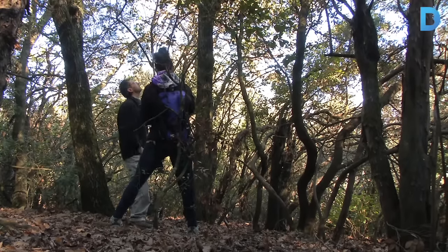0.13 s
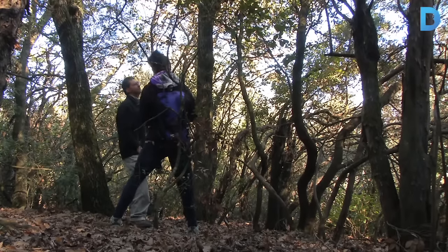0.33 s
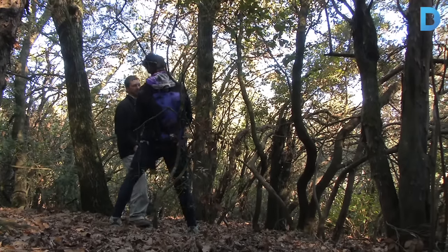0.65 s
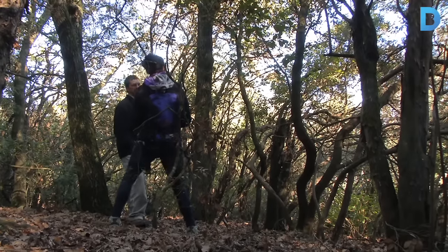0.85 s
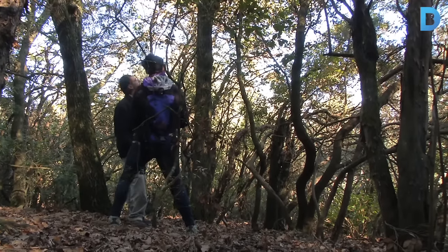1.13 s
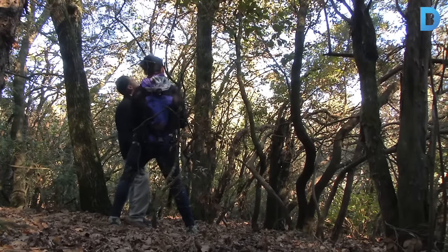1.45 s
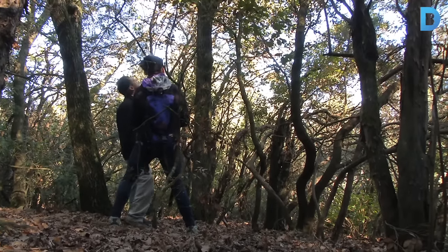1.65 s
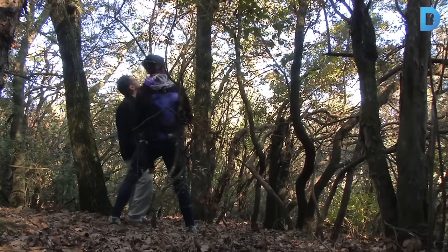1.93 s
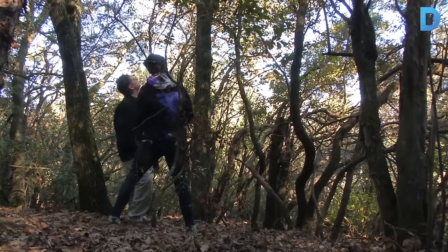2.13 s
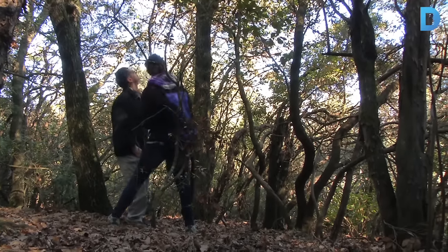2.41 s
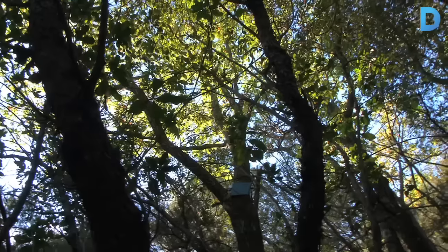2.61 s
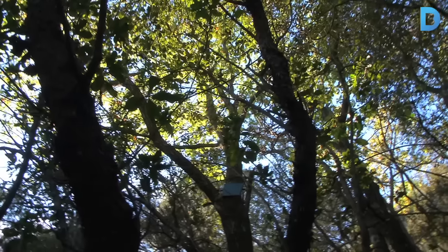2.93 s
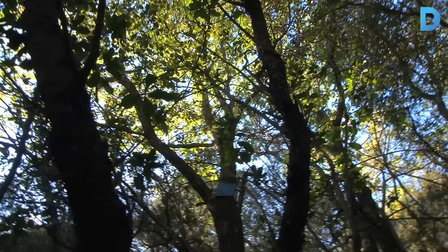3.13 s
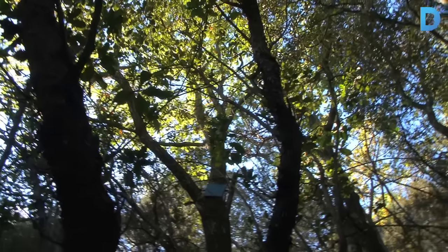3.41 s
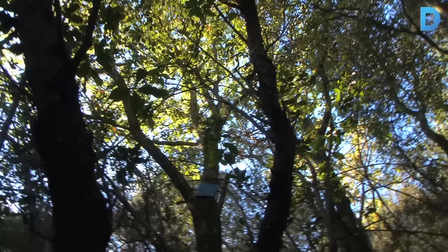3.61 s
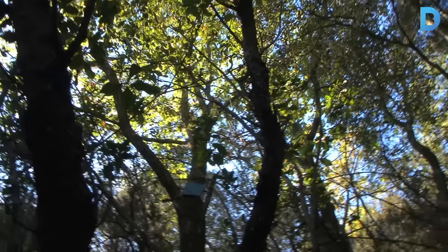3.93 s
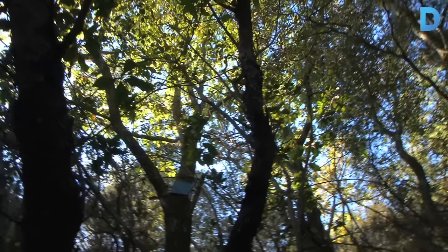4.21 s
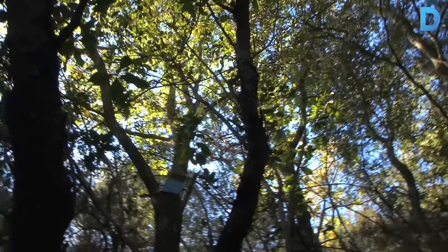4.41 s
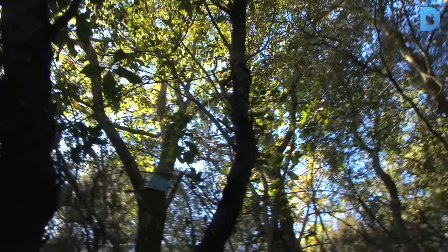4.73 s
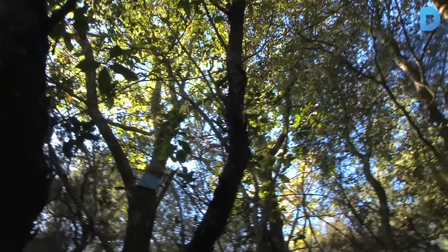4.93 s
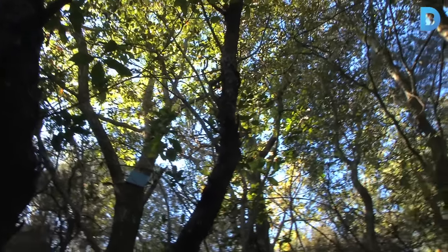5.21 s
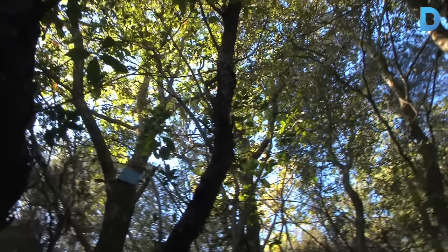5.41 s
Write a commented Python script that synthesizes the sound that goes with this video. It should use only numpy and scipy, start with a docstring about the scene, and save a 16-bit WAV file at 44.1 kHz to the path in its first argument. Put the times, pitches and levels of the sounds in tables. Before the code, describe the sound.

A quiet forest bed of low rumble and fine hiss runs throughout, dipping a little after the opening and partly recovering. From about 0.15 to 0.75 s a woodpecker drums some fifteen blows, quickly building, accelerating, then weakening; each has a hollow woody ring and a broad crack, and the echoes hang in the trees. Faint thin whistles come around 1.3-1.5 s. From 1.5 to 2.65 s a small bird sings six see-saw pairs, a clear rising high note and a huskier falling one, distant and diffuse. At 2.8 s a larger, nearer bird gives a thin rising squeal that cracks lower and ends hoarsely by 3.05 s. A buzzy, fluttering trill of nine syllables runs from 3.25 to 4.2 s. From 3.75 s ten short, bright, nasal yelps start, soon settling to about five per second and lasting to the end, around 5.5 s, with scattered high whistles between.

```python
"""A low rumble and a fine hiss open the scene and last throughout: two noises with shaped spectra.
A woodpecker drums: each blow rings a hollow branch and adds a broad crack. Small birds give thin whistles,
a see-saw song and a buzzy trill, all made from bent, fluttering sines. A larger bird squeals, then yelps
a run of loud notes, both built from harmonics. Trunks and leaves scatter every sound but the background."""
import sys
import numpy as np
from scipy import signal
from scipy.fft import rfft, irfft
from scipy.io import wavfile

SR = 44100
rng = np.random.default_rng(int(sys.argv[2]) if len(sys.argv) > 2 else 0)


def master(y):
    """Save y as 16-bit WAV."""
    cut = np.clip(np.atleast_2d(y).T, -1, 1)
    pcm = np.round(cut * 32767)  # scale
    wavfile.write(sys.argv[1], SR, pcm.astype(np.int16))


N = 245175


def from_db(db):
    """Turn decibels into a gain."""
    return 10 ** (np.asarray(db) / 20)


def rms_one(x):
    """Scale a sound to an rms (average strength) of 1."""
    return x / np.sqrt(np.mean(x ** 2) + 1e-20)


def along(rows, at):
    """Read every later column of a table at the given places of its first column."""
    first, *columns = np.transpose(rows)
    return [np.interp(at, first, column) for column in columns]


def at_hz(points, hz):
    """Read a spectrum in dB, with straight lines between its points on a log-frequency axis."""
    knots, values = np.transpose(points)
    return np.interp(np.log(hz + 1), np.log(knots), values)


def add(out, start_s, sound):
    """Mix a sound in at a given time."""
    start = max(round(start_s * SR), 0)
    out[start:start + len(sound)] += sound[:N - start]


def waver(rate_hz, size):
    """Random wandering about 0: straight lines between random values of spread 1."""
    step = SR / rate_hz
    knots = rng.standard_normal(1024)
    return np.interp(np.arange(size) / step, np.arange(len(knots)), knots)


def coloured_noise(spectrum):
    """Steady noise with a given spectrum, rms 1."""
    hz = np.arange(N // 2 + 1) * SR / N
    white = rfft(rng.standard_normal(N))
    return rms_one(irfft(white * from_db(at_hz(spectrum, hz)), N))


def ring(clicks, hz, t60):
    """A resonance passed twice: a unit click swells to a sine of height about 1, then dies away."""
    decay = np.log(1000) / (t60 * SR)
    w = 2 * np.pi * hz / SR
    r = np.exp(-decay)
    section = [0, np.sin(w), 0, 1, -2 * r * np.cos(w), r * r]
    return 2 * np.e * decay * signal.sosfilt([section, section], clicks + 1e-18)


def whistle(length_s, sweep_hz, warble, warble_hz, rough):
    """One near-sine note bent through three pitches; the bird's voice organ flutters around that line."""
    u = np.linspace(0, 1, int(length_s * SR))   # place within the note
    line_hz = np.polyval(np.polyfit([0, .5, 1], sweep_hz, 2), u)
    flutter = warble * np.sin(2 * np.pi * warble_hz * length_s * u) + rough * waver(511, len(u))
    phase = 2 * np.pi * np.cumsum(line_hz * (1 + flutter)) / SR
    swell = signal.windows.tukey(len(u), .3)
    return np.sqrt(2) * swell * np.sin(phase)


def forest(x, direct_db, near_db, near_t60, far_db, far_t60, build_s, dull_hz):
    """Direct sound, a quick scatter from near trunks, and a long tail that builds up from the wood beyond."""
    t = np.arange(SR * 3 // 2) / SR
    echoes = rng.standard_normal((2, len(t)))
    near = rms_one(echoes[0] * from_db(-60 * t / near_t60) * (t > .002))
    far = rms_one(echoes[1] * from_db(-60 * t / far_t60) * np.minimum(t / build_s, 1))
    scatter = (from_db(near_db) * near + from_db(far_db) * far) / np.sqrt(len(t))
    # both scatters lose treble
    dulling = signal.butter(1, min(dull_hz, SR / 2 - 100), fs=SR, output="sos")
    scatter = signal.sosfilt(dulling, scatter)
    return from_db(direct_db) * x + signal.fftconvolve(x, scatter)[:N]


# How the background level moves. Each row: time in seconds, level in dB before the shared gain.
BACKGROUND_LEVEL = [(0.02, -36), (0.74, -35.5), (1.29, -40.5), (1.89, -38), (5.56, -37.5)]
# Tone colour of the low rumble. Each row: frequency in Hz, relative strength in dB.
RUMBLE_SPECTRUM = [(20, -10.5), (55, -3), (80, -3), (115, -1), (160, -0.5), (230, -4), (320, -7),
                   (460, -10.5), (950, -17), (2500, -24), (5000, -53)]
# Tone colour of the fine hiss. Each row: frequency in Hz, relative strength in dB.
HISS_SPECTRUM = [(1500, -12.5), (3000, -1.5), (5000, -2), (7000, -2), (9000, -1), (11000, 1), (13300, 5),
                 (15000, 2.5), (16000, -1)]


def background(gain_db):
    """Low rumble and fine hiss as shaped noise; both sink after the drum roll, then partly recover."""
    level_db, = along(BACKGROUND_LEVEL, np.arange(N) / SR)
    rumble = coloured_noise(RUMBLE_SPECTRUM)
    hiss = coloured_noise(HISS_SPECTRUM)
    return from_db(level_db + gain_db) * (rumble + hiss)


# the gap between blows closes on a shortest gap, keeping a share of the excess each time
ROLL_START_S, FIRST_GAP_S, SHORTEST_GAP_S, GAP_KEEPS = .1528, .05727, .02914, .915
# strongest blow in dB, then the slopes in dB per blow: building up, tiring and giving out
ROLL_DB, ROLL_BUILD_DB, ROLL_TIRE_DB, ROLL_QUIT_DB = -11, 3, 0.32, 2.5


def drum_roll(count, peak_index, quit_index):
    """Times and levels of the beak's blows: they come ever faster, build, tire and give out."""
    k = np.arange(count)
    gaps = SHORTEST_GAP_S + (FIRST_GAP_S - SHORTEST_GAP_S) * GAP_KEEPS ** k
    times = ROLL_START_S + np.cumsum(gaps) - gaps
    build_loss_db = ROLL_BUILD_DB * np.maximum(peak_index - k, 0)
    tire_loss_db = ROLL_TIRE_DB * np.maximum(k - peak_index, 0)
    quit_loss_db = ROLL_QUIT_DB * np.maximum(k - quit_index, 0)
    return times, ROLL_DB - (build_loss_db + tire_loss_db + quit_loss_db)


# Ringing tones (modes) of the hollow branch.
# Each row: frequency in Hz, level in dB, time in seconds for one pass of the resonance to fall by 60 dB.
BRANCH_MODES = [(439, -16, 0.038), (690, -13.5, 0.027), (858, -20, 0.023), (1120, -26.5, 0.028),
                (1235, -14, 0.018), (1327, -24, 0.041), (1810, -29, 0.022), (2120, -17.5, .008),
                (2864, -8.5, 0.009), (3650, -5, 0.003), (3755, -6, 0.0056), (3977, -22.5, 0.031),
                (5140, -15, 0.0031), (6570, -14.5, 0.0024)]


def woodpecker(times, blow_db):
    """Each blow of the beak sets all modes of the hollow branch ringing."""
    out = np.zeros(N)
    for k, (hz, mode_db, t60) in enumerate(BRANCH_MODES):
        clicks = np.zeros(N)
        clicks[np.round(times * SR).astype(int)] = from_db(blow_db + mode_db)
        out += (-1) ** k * ring(clicks, hz, t60)   # neighbouring modes push opposite ways
    return out


def bark_cracks(times, blow_db, crack_db):
    """Each blow of beak on bark also throws a short broad crack: a click through a wide band filter."""
    clicks = np.zeros(N)
    clicks[np.round(times * SR).astype(int)] = from_db(blow_db + crack_db)
    crack_band = signal.butter(2, (790, 2630), "band", fs=SR, output="sos")   # Hz
    return signal.sosfilt(crack_band, clicks + 1e-18)


# Thin whistles of the small birds. Each row: start in seconds, length in seconds, start pitch in Hz,
# end pitch in Hz, level in dB before the forest, random pitch spread as a share of the pitch.
WHISTLE_NOTES = [(1.322, .059, 4500, 4670, -43.5, 0.07), (1.4, 0.06, 7180, 6850, -39.5, .025),
                 (1.433, .07, 6220, 5750, -38, .03), (2.809, 0.061, 4184, 4880, -30.5, 0.05),
                 (2.911, 0.12, 8730, 7760, -30.5, 0.01), (3.12, 0.053, 3460, 3680, -38.5, 0.04),
                 (3.227, 0.065, 5980, 6050, -28, 0.02), (3.348, 0.058, 6030, 6020, -30, 0.06),
                 (4.173, 0.11, 7760, 8050, -32, .02), (4.42, 0.023, 5470, 5480, -22.5, 0.01),
                 (4.49, 0.095, 7700, 7540, -32, 0), (4.611, 0.065, 4290, 4262, -30, .01),
                 (4.776, 0.072, 6700, 5930, -40.5, .11), (4.914, 0.1, 6840, 6540, -37.5, 0.01),
                 (5.01, 0.035, 5520, 5240, -32, 0.03), (5.046, 0.065, 5000, 4700, -32, 0.08),
                 (5.122, .11, 5860, 6500, -35.5, 0.05)]
WHISTLE_SETTLES = .75   # share of its glide that a whistle has made halfway through


def whistles():
    """Pure and husky bent sines; each glides quickly at first, then settles."""
    out = np.zeros(N)
    for start_s, length_s, start_hz, end_hz, level_db, rough in WHISTLE_NOTES:
        middle_hz = start_hz + WHISTLE_SETTLES * (end_hz - start_hz)
        note = whistle(length_s, (start_hz, middle_hz, end_hz), 0, 0, rough)
        add(out, start_s, from_db(level_db) * note)
    return out


# Note pairs of the see-saw song. Each row: start of the rising note in seconds,
# time from there to the falling note in seconds, level in dB before the forest.
SONG_PAIRS = [(1.505, 0.077, -30), (1.669, 0.12, -28), (1.864, 0.12, -28), (2.073, 0.12, -26.5),
              (2.281, .118, -26.5), (2.491, 0.12, -27)]
# start, middle and end pitch of the two notes, before the song sinks
RISE_HZ, FALL_HZ = (5530, 6410, 6607), (5380, 4403, 3440)
# a short rest parts the notes; the song sinks by a share of its pitch per second; the fall is weaker
SEESAW_REST_S, SEESAW_SINK_PER_S, FALL_DB = 0.0145, 0.0224, -3.5


def tit(fall_s, swell_db):
    """A clear rising note and a husky falling one in turn, about five pairs a second."""
    out = np.zeros(N)
    for start_s, turn_s, level_db in SONG_PAIRS:
        key = 1 - SEESAW_SINK_PER_S * (start_s - SONG_PAIRS[0][0])
        rise_s = turn_s - SEESAW_REST_S
        u = np.linspace(0, 1, int(rise_s * SR))
        # the rising note steadies and swells as it nears its top
        steadying = 0.038 * (1 - 0.75 * u)
        rise = whistle(rise_s, key * np.array(RISE_HZ), warble=0.0071, warble_hz=140.4, rough=steadying)
        add(out, start_s, from_db(level_db - swell_db * (1 - u)) * rise)
        fall = whistle(fall_s, key * np.array(FALL_HZ), warble=0.071, warble_hz=208.4, rough=0.053)
        add(out, start_s + turn_s, from_db(level_db + FALL_DB) * fall)
    return out


# Path of the squeal, which rises and then breaks to a lower note.
# Each row: time in seconds, pitch in Hz, level in dB before the overtone and the forest.
SQUEAL_PATH = [(2.78, 938, -49), (2.792, 954, -38), (2.802, 1140, -36), (2.83, 1347, -42),
               (2.892, 1410, -36.5), (2.914, 1604, -35), (2.944, 1700, -25), (2.958, 1274, -41),
               (2.994, 1286, -29.5), (3.028, 1224, -47), (3.05, 860, -34.5)]
SQUEAL_BREAK_S = 2.955


def squeal(thin_db, cracked_db, rough, end_rough, end_s):
    """A thin rising tone that cracks, gains a strong second harmonic and ends in a hoarse drop."""
    t = np.arange(SQUEAL_PATH[0][0], SQUEAL_PATH[-1][0], 1 / SR)
    pitch, level_db = along(SQUEAL_PATH, t)
    ending = np.exp((t - t[-1]) / end_s)   # climbs to 1 at the very end
    second_db = np.where(t < SQUEAL_BREAK_S, thin_db, cracked_db * (1 - ending))
    hoarseness = rough + end_rough * ending
    phase = 2 * np.pi * np.cumsum(pitch * (1 + hoarseness * waver(800, len(t)))) / SR
    voice = np.sin(phase) + from_db(second_db) * np.sin(2 * phase)
    out = np.zeros(N)
    add(out, t[0], np.sqrt(2) * from_db(level_db) * voice)
    return out


# evenly spaced syllables, a little weaker at both ends of the trill
TRILL_START_S, TRILL_PERIOD_S, TRILL_DB, TRILL_ENDS_DB = 3.264, .1012, -27, 1.5
# the strokes within a syllable sweep down in pitch, each weaker than the last
STROKE_SWEEP_HZ, STROKE_S, STROKE_GAP_S, STROKE_LOSS_DB = (6390, 5310, 4230), .03, .035, 6


def trill(count, tick_hz, tick_s, tick_db):
    """Each syllable is three fast-fluttering downward strokes, the last with a faint high tick."""
    out = np.zeros(N)
    for syllable, place in enumerate(np.linspace(-1, 1, count)):
        start_s = TRILL_START_S + syllable * TRILL_PERIOD_S
        level_db = TRILL_DB - TRILL_ENDS_DB * place ** 2
        for k in range(3):
            stroke = whistle(STROKE_S, STROKE_SWEEP_HZ, warble=0.12, warble_hz=172.4, rough=0.0318)
            add(out, start_s + k * STROKE_GAP_S, from_db(level_db - k * STROKE_LOSS_DB) * stroke)
        tick = whistle(tick_s, [tick_hz] * 3, 0, 0, rough=.008)
        add(out, start_s + 2 * STROKE_GAP_S, from_db(level_db + tick_db) * tick)
    return out


# Yelps of the large bird. Each row: start in seconds, length in seconds, top pitch in Hz,
# level in dB before the throat and the forest.
YELP_NOTES = [(3.746, 0.041, 941, -30.5), (3.932, 0.036, 1169, -27), (4.173, 0.042, 1179, -25),
              (4.397, 0.046, 1201, -25), (4.593, .046, 1208, -26), (4.768, 0.043, 1218, -25.5),
              (4.941, .052, 1262, -26.5), (5.124, .046, 1274, -25.5), (5.311, 0.042, 1255, -24.5),
              (5.495, 0.056, 1240, -28)]
# Colouring of the voice: resonances of its throat, and a narrow dip near 2420 Hz. Each row: frequency in Hz,
# gain in dB.
THROAT_GAIN = [(900, -9), (1200, -15.5), (1800, 3), (2270, 6), (2420, -1), (2500, 7.5), (2850, -14),
               (3300, -0.5), (3550, -3.5), (3850, -7), (5000, 0.5), (7500, -15)]
# Strength of the voice's first six harmonics before the throat, in dB, lowest first.
HARMONICS_DB = [3, -3.5, -2.5, -11.5, -9, -22]
# a yelp scoops up, sags a little and drops at the very end: depths as shares of the top pitch
YELP_SCOOP, YELP_SAG, YELP_DROP = 0.328, .025, 0.435
YELP_SCOOP_S, YELP_DROP_POWER = 0.00303, 7.01   # a higher power makes the drop later and steeper
# it swells quickly, then loses level in dB and brightness in dB per harmonic above the second
YELP_ATTACK_S, YELP_HOLD_DB, YELP_FADE_DB, YELP_DULL_DB = 0.013, 2, 6, 5.5


def yelps(rough, onset_rough, onset_s):
    """Hoarse-starting notes that drop and dull; their harmonics slide through the throat resonances."""
    out = np.zeros(N)
    for start_s, length_s, top_hz, level_db in YELP_NOTES:
        u = np.linspace(0, 1, int(length_s * SR))
        t = u * length_s
        drop = u ** YELP_DROP_POWER
        bend = 1 - YELP_SCOOP * np.exp(-t / YELP_SCOOP_S) - YELP_SAG * u - YELP_DROP * drop
        swell = np.minimum(t / YELP_ATTACK_S, 1) * from_db(YELP_HOLD_DB - YELP_FADE_DB * drop)
        tilt_db = -YELP_DULL_DB * u ** 2
        hoarseness = rough + onset_rough * np.exp(-t / onset_s)
        pitch = top_hz * bend * (1 + hoarseness * waver(1464, len(u)))
        phase = 2 * np.pi * np.cumsum(pitch) / SR
        voice = np.zeros(len(u))
        for k, harmonic_db in enumerate(HARMONICS_DB, 1):
            strength_db = harmonic_db + at_hz(THROAT_GAIN, k * pitch) + tilt_db * max(k - 2, 0)
            voice += from_db(strength_db) * np.sin(k * phase)
        soft_edges = signal.windows.tukey(len(u), .1)
        add(out, start_s, np.sqrt(2) * from_db(level_db) * swell * voice * soft_edges)
    return out


def scene():
    """Each source gets its own blend of direct and scattered sound; both channels carry the same mix."""
    air = background(gain_db=3.0)
    times, blow_db = drum_roll(count=15, peak_index=2, quit_index=12)
    drum = woodpecker(times, blow_db)
    drum = forest(drum, direct_db=1.5, near_db=-3.5, near_t60=0.14,
                  far_db=-3.0, far_t60=0.81, build_s=0.037, dull_hz=2470)
    # the cracks are heard mostly as they return from the trees
    cracks = bark_cracks(times, blow_db, crack_db=19.0)
    cracks = forest(cracks, direct_db=-9, near_db=0.5, near_t60=0.072,
                    far_db=2.5, far_t60=0.85, build_s=0.027, dull_hz=5000)
    # the small birds sit deep among the trees
    song = whistles() + trill(count=9, tick_hz=7480, tick_s=0.028, tick_db=-14.0)
    song = forest(song, direct_db=-6.0, near_db=-4, near_t60=0.43,
                  far_db=-5, far_t60=0.9, build_s=0.028, dull_hz=11800)
    seesaw = tit(fall_s=0.039, swell_db=3)
    seesaw = forest(seesaw, direct_db=-13, near_db=-3.0, near_t60=0.15,
                    far_db=-1.0, far_t60=0.99, build_s=0.036, dull_hz=12000)
    # the large bird is nearer
    cry = squeal(thin_db=-32, cracked_db=-7.5, rough=0.016, end_rough=0.17, end_s=0.016)
    cry = forest(cry, direct_db=0, near_db=-10, near_t60=.18,
                 far_db=-7, far_t60=.8, build_s=.05, dull_hz=7000)
    run = yelps(rough=0.0092, onset_rough=.2, onset_s=0.0075)
    run = forest(run, direct_db=-3.5, near_db=-4, near_t60=0.19,
                 far_db=-4.0, far_t60=1.06, build_s=0.021, dull_hz=7260)
    mono = air + drum + cracks + song + seesaw + cry + run
    return np.array([mono, mono])


def record(dry):
    """A steep low-pass filter removes the very top of the treble."""
    low_pass = signal.ellip(12, .1, 85, 15750, fs=SR, output="sos")   # cutoff in Hz
    return signal.sosfilt(low_pass, dry)


dry = scene()
out = record(dry)
master(out)
```